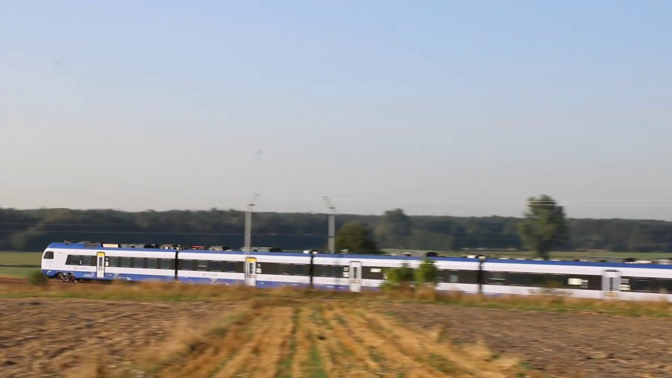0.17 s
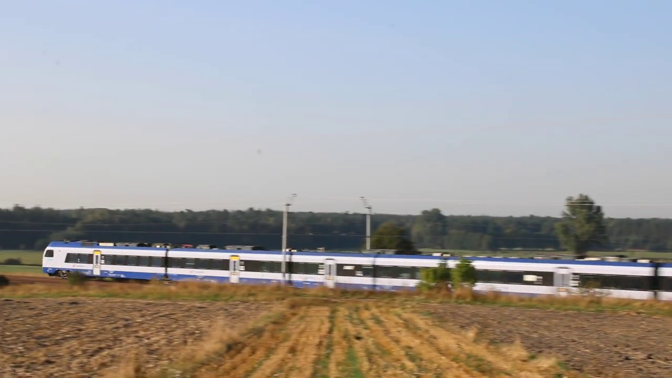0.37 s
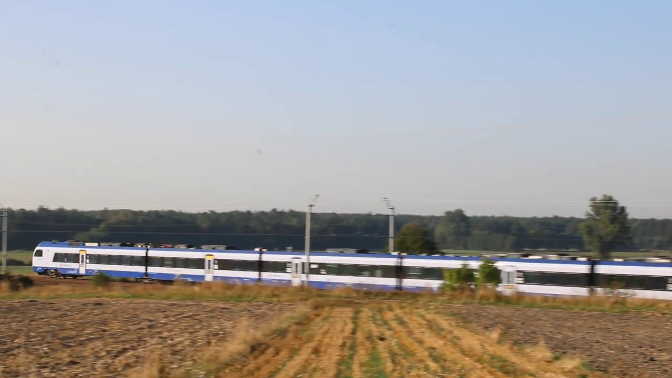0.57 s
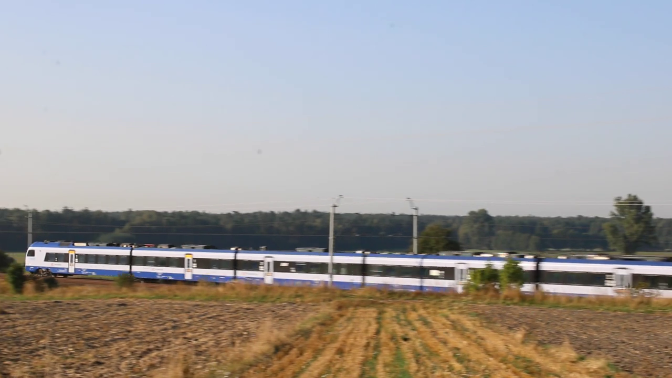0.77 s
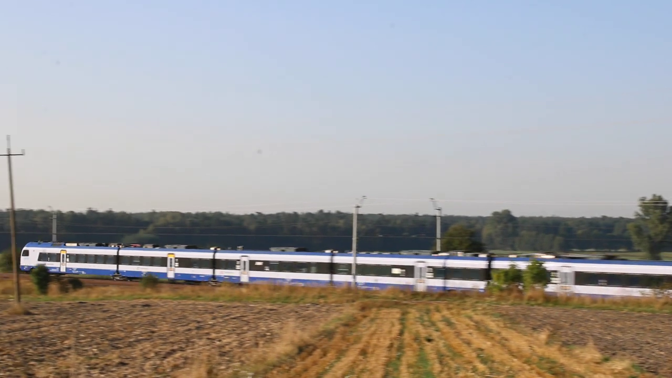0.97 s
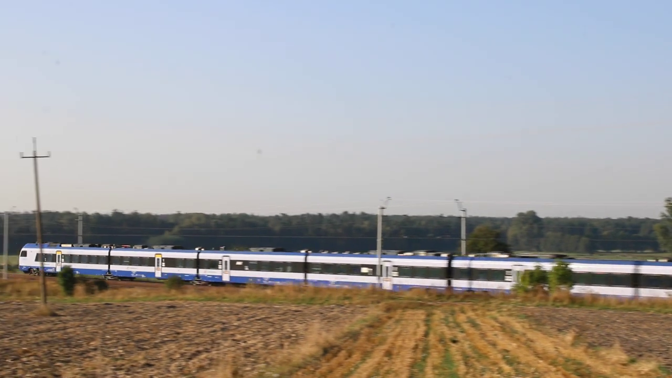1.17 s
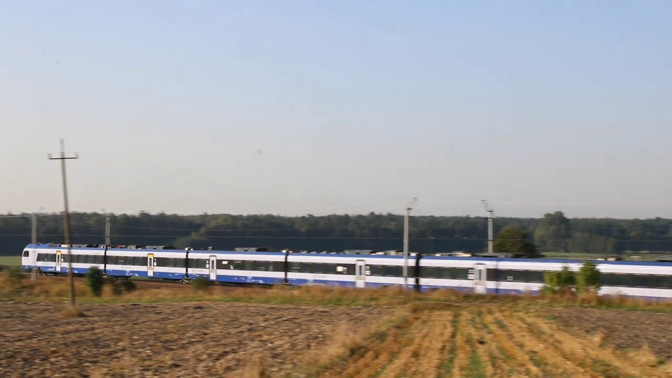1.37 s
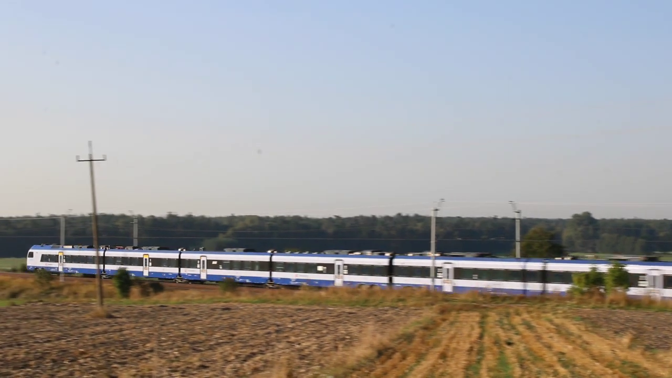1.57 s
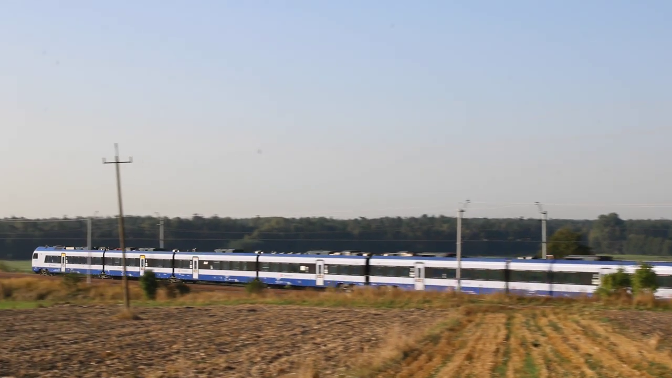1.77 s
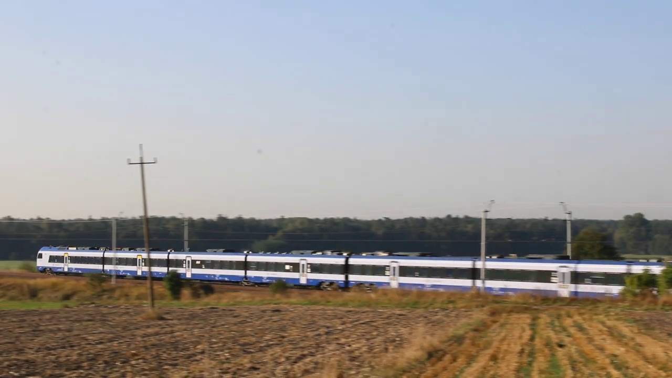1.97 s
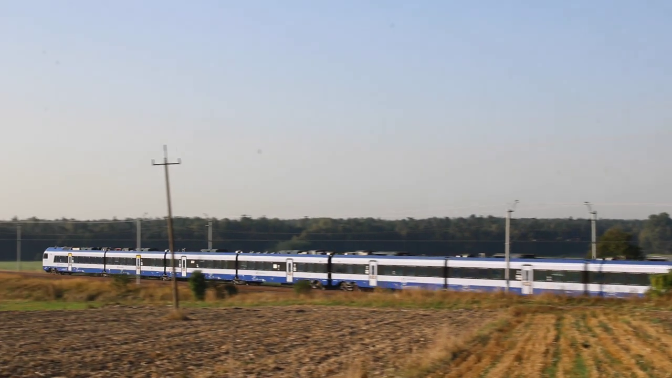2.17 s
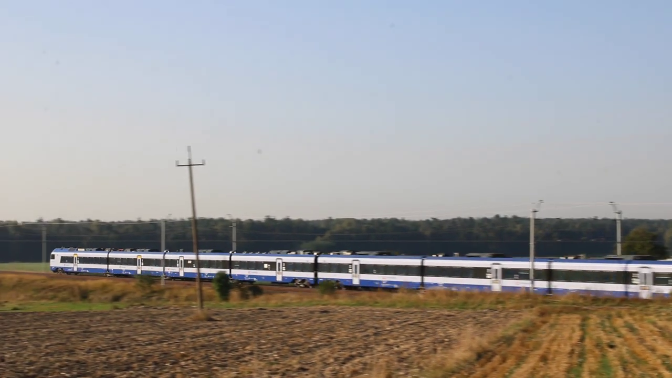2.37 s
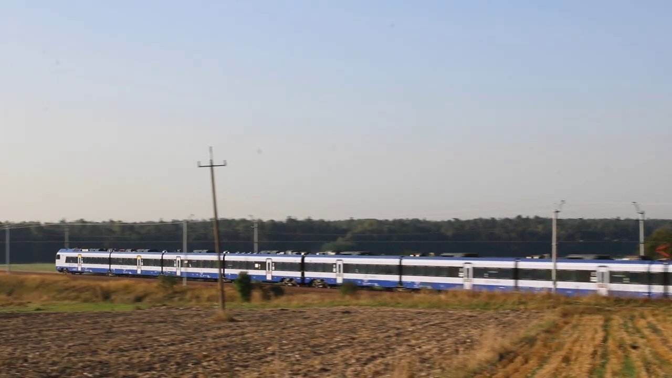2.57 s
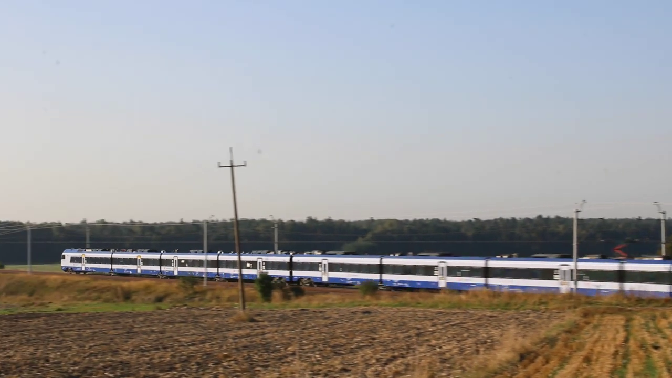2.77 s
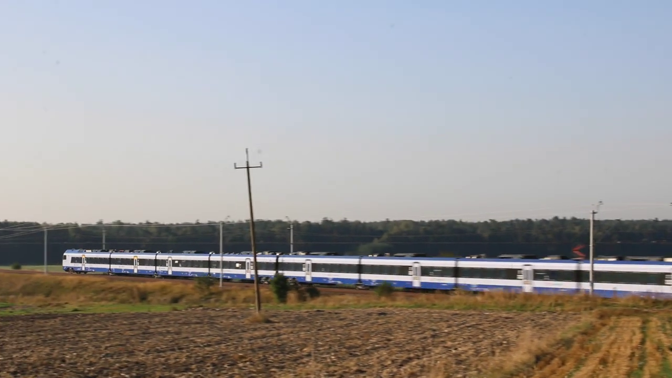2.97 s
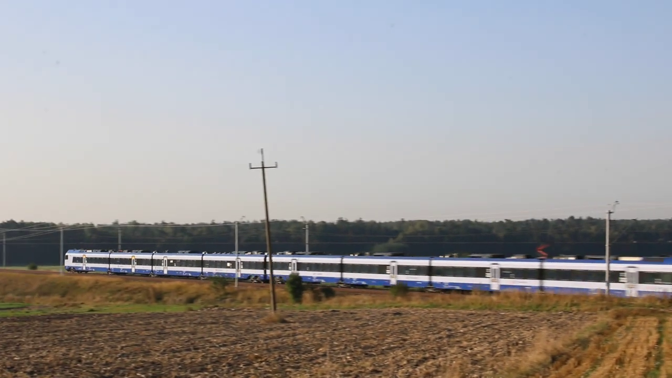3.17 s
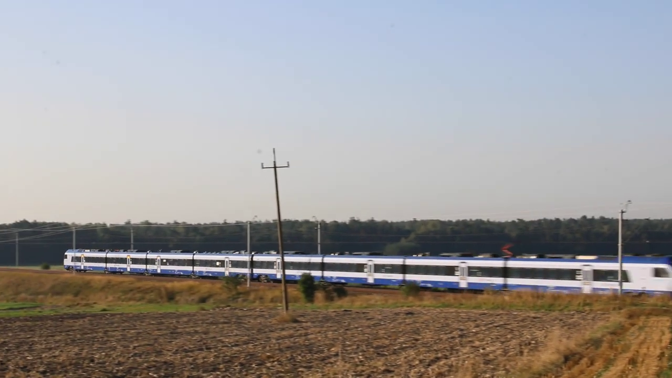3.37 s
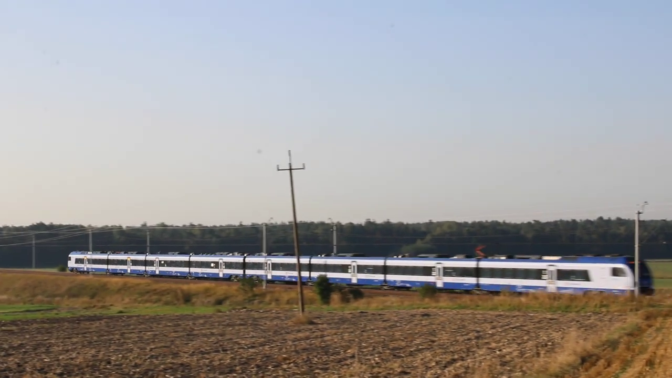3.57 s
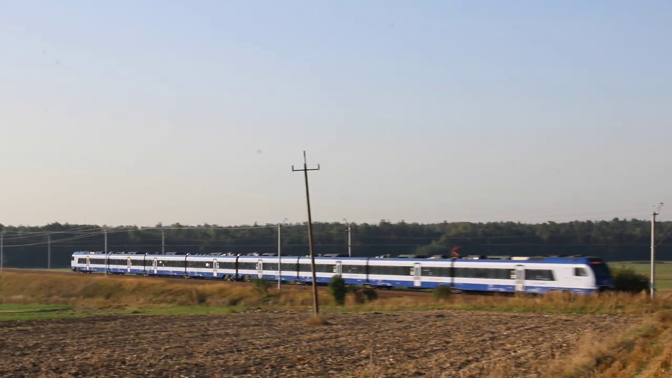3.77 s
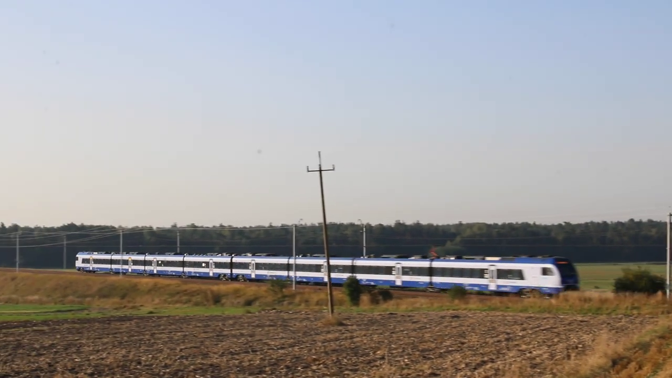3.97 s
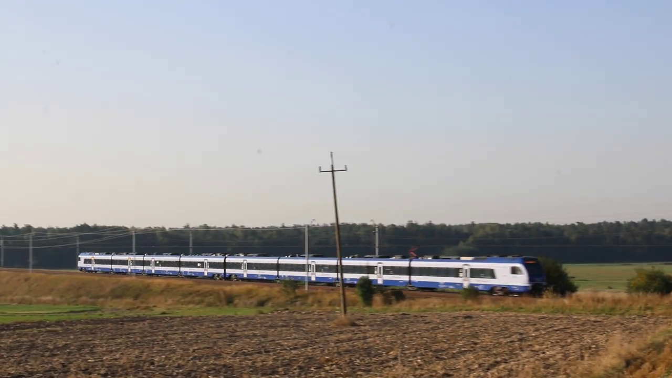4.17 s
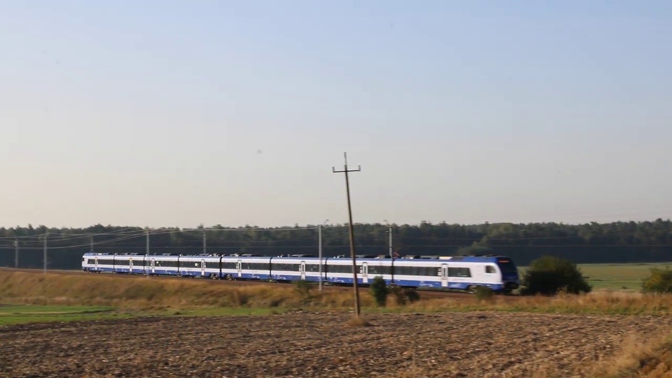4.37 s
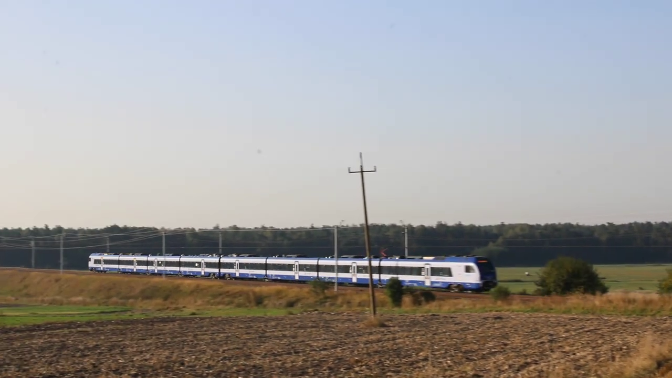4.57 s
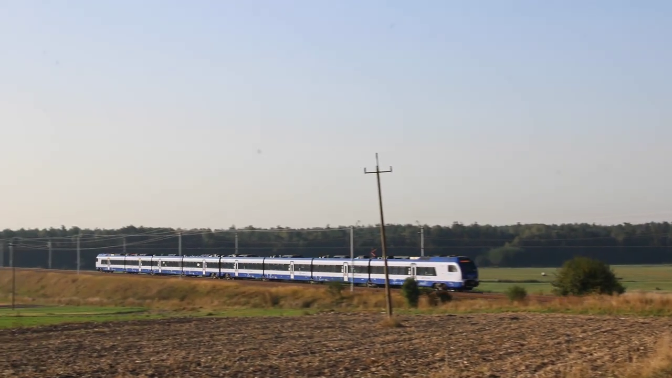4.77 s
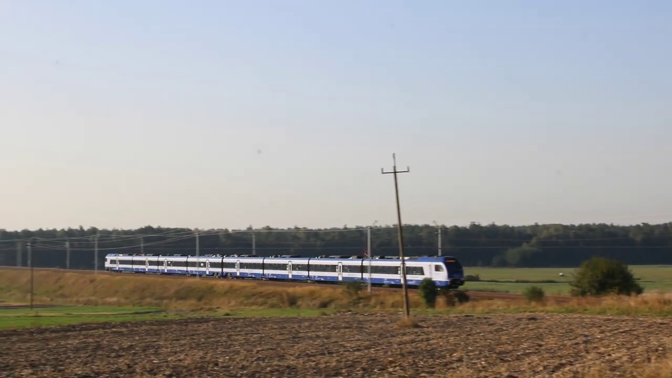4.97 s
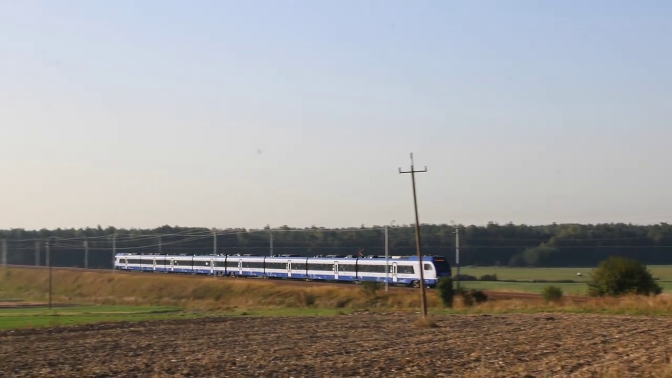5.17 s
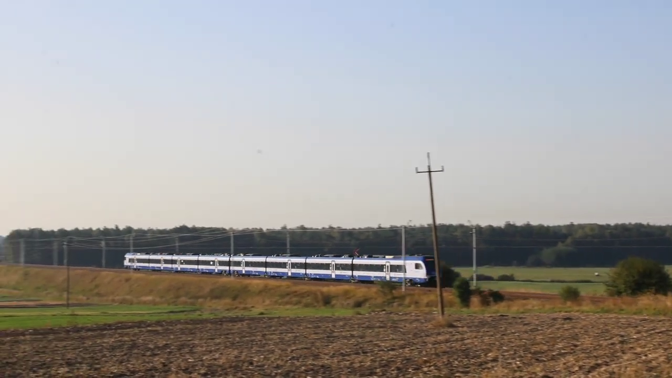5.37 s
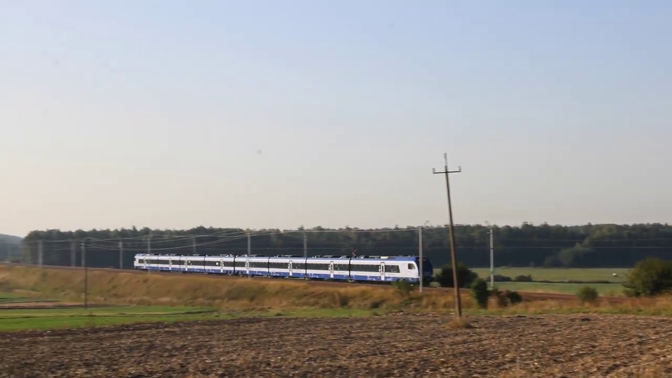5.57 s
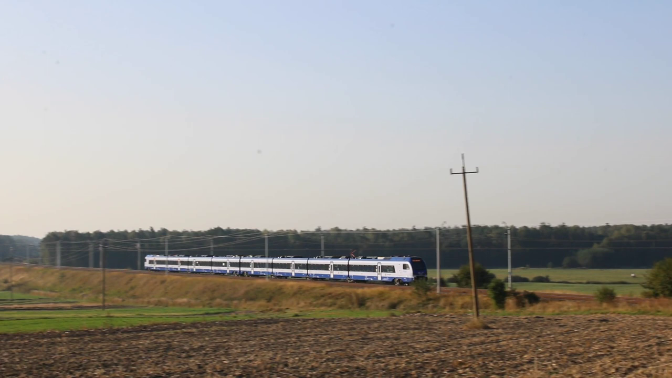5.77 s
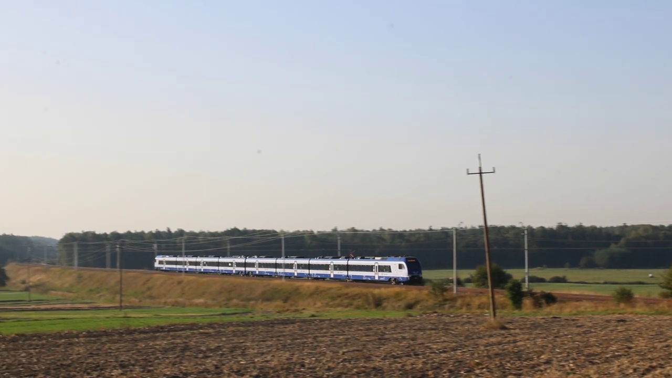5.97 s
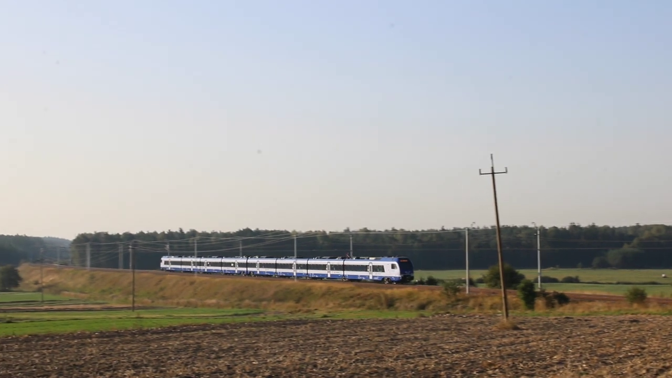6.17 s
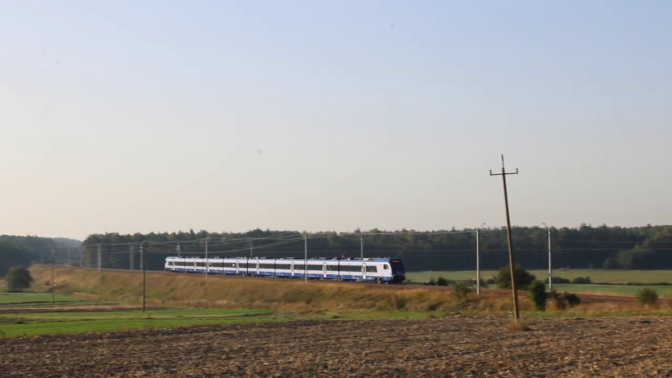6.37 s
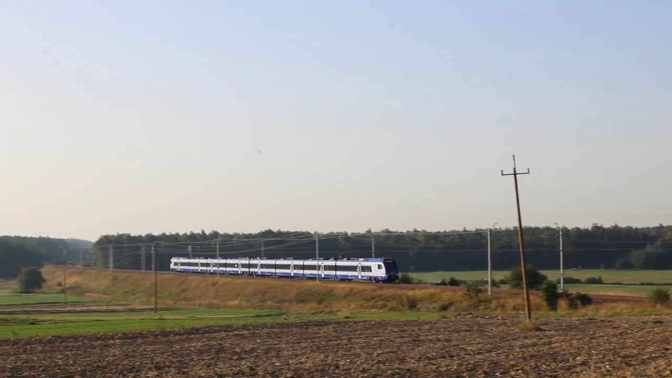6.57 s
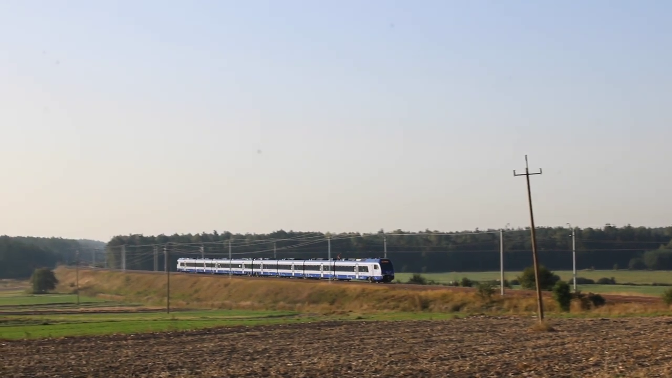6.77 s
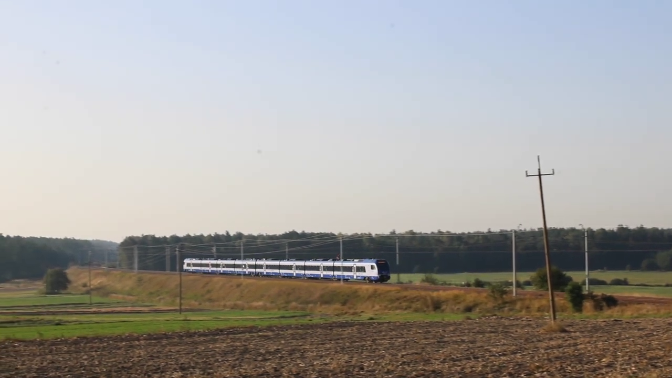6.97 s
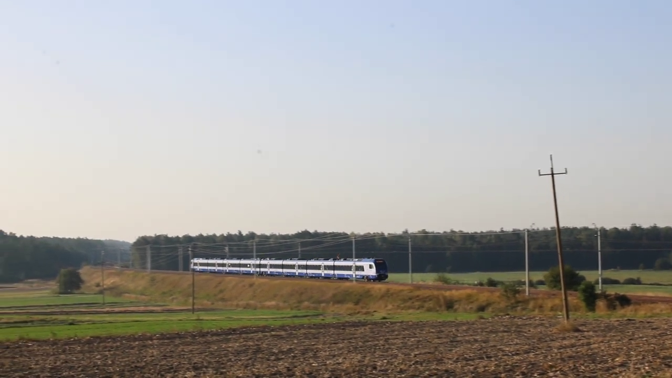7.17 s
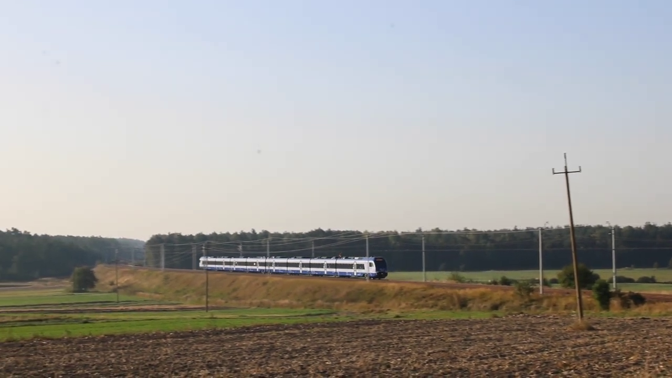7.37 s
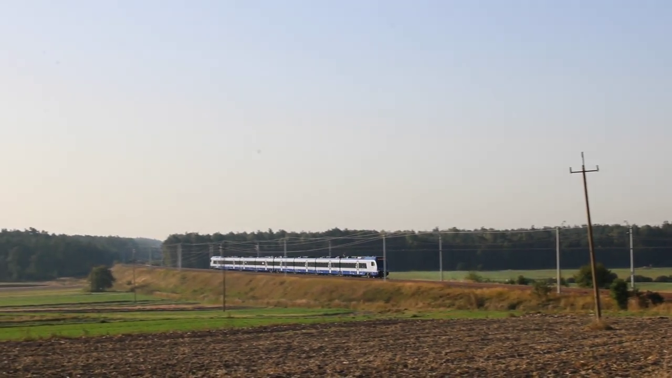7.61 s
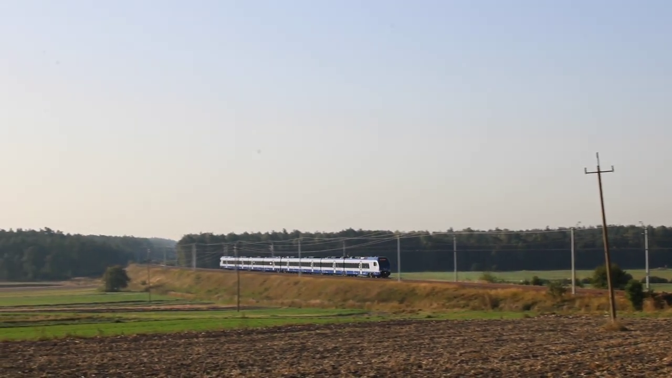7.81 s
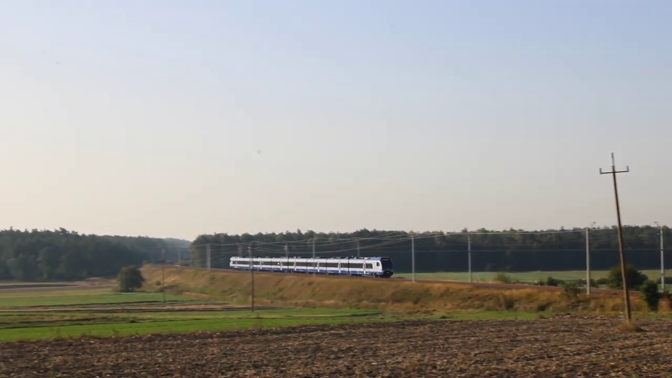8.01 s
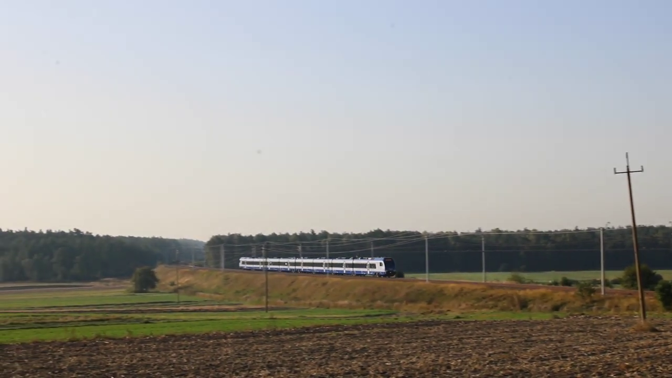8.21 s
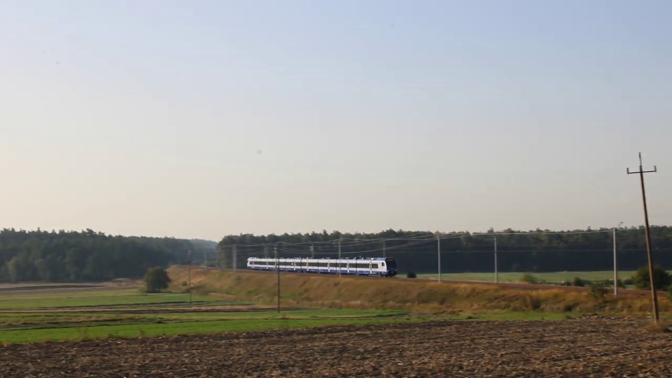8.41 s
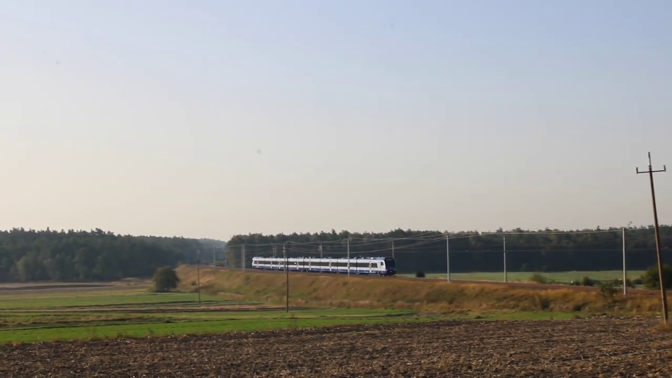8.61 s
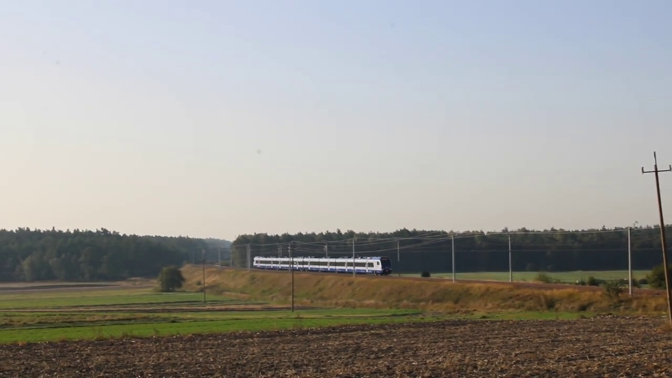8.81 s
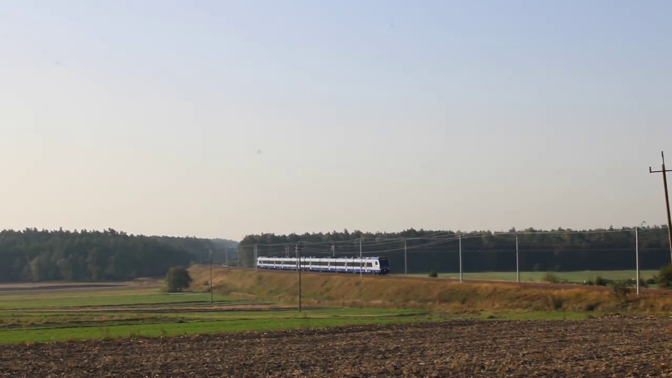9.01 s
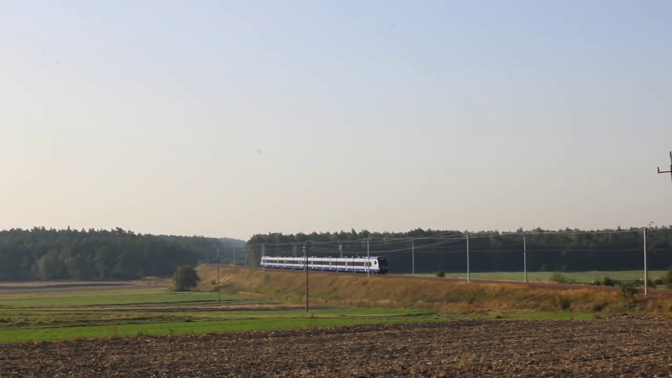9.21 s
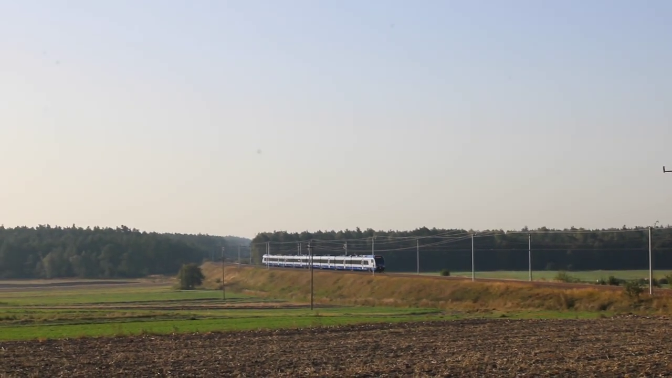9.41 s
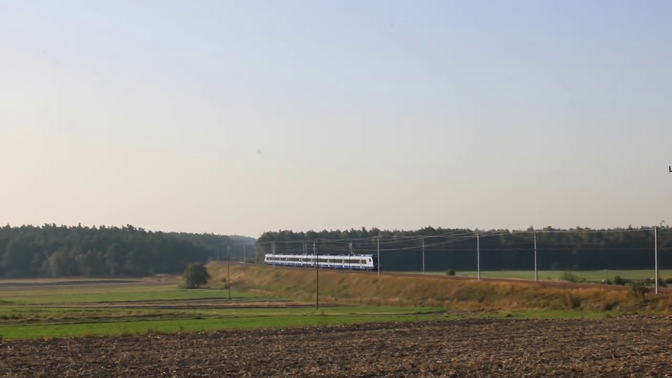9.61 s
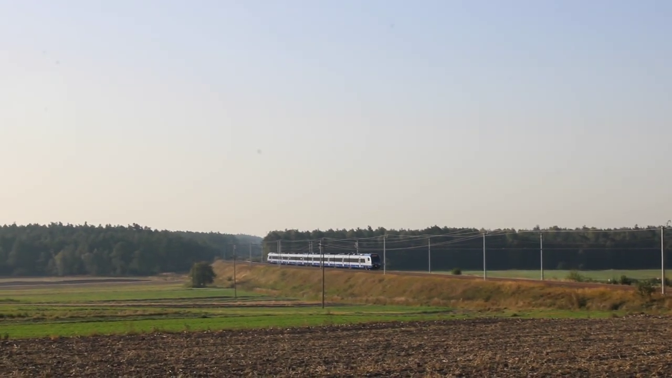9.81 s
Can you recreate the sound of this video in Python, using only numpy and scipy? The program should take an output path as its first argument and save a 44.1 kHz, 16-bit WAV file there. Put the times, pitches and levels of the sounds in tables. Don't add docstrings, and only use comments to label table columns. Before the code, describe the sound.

A fast electric train runs away from a camera microphone at the field's edge. Its broad rolling roar swells a little, peaks around three and a half seconds, then gradually fades and dulls. Metallic wheel singing and a wavering motor whine slide slightly downward. Irregular low wind thumps crowd the opening, some nearly overloading; afterwards it is calmer, with tiny camera clicks, low rumble, and a little wind returning at the very end.

```python
import sys
import numpy as np
from scipy import signal
from scipy.fft import irfft, next_fast_len
from scipy.io import wavfile
from scipy.ndimage import uniform_filter1d

SR = 44100
rng = np.random.default_rng(int(sys.argv[2]) if len(sys.argv) > 2 else 0)


def convert_level_to_amplitude(level_db):
    exponent = np.asarray(level_db, float) / 20
    return 10 ** exponent


def wav_record(signal):
    frames = np.transpose(np.atleast_2d(signal))
    bounded = np.clip(frames, -1, 1)
    quanta = np.round(bounded * 32767).astype(np.int16)
    wavfile.write(sys.argv[1], SR, quanta)


N = 434385
LONG_N = N + N // 10

SPEED_M_S, TRACK_M, ABREAST_RATIO = 25, 57, 1.068

# start_s, buffeting_db
BREEZE = [(0, -29.5), (.33, -34), (.74, -31.5), (1.07, -28.5), (1.21, -33.5), (1.6, -32), (2.36, -36),
          (2.9, -29.5), (3.21, -35), (3.8, -39.5), (5.2, -42), (5.7, -40.5), (6.7, -51), (7.6, -47),
          (8, -55), (9.6, -47), (9.8, -28), (9.85, -27)]


def curves(table):
    s, *columns = np.transpose(table)
    return [np.interp(np.arange(N) / SR, s, column) for column in columns]


def shaped(gain_at, size=N):
    n = next_fast_len(size, True)
    re, im = rng.standard_normal((2, n // 2 + 1))
    hz = np.arange(n // 2 + 1) * SR / n + 1e-3
    x = irfft((re + 1j * im) * gain_at(hz), n)[:size]
    return x / np.std(x)


def coloured(points, size=N):
    hz, db = np.transpose(points)
    return shaped(lambda f: convert_level_to_amplitude(np.interp(np.log(f), np.log(hz), db, left=-150, right=-150)), size)


def walk(rate_hz, size=N):
    hold, fine = int(SR / rate_hz), 16
    steps = np.repeat(rng.standard_normal(size // hold + 1), fine)
    slewed = 1.3 * uniform_filter1d(uniform_filter1d(steps, fine), fine)
    return np.interp(np.arange(size) * fine / hold, np.arange(len(slewed)), slewed)


def tone(hz, waver_hz, flutter_db):
    phase = 2 * np.pi * np.cumsum(hz + waver_hz * walk(25)) / SR
    return np.sqrt(2) * convert_level_to_amplitude(flutter_db * walk(20)) * np.sin(phase)


def add(out, piece, at):
    lo, hi = max(at, 0), min(at + len(piece), len(out))
    out[lo:hi] += piece[lo - at:hi - at]


def motion():
    along_m = SPEED_M_S * np.arange(N) / SR
    range_m = np.hypot(along_m, TRACK_M)
    ratio = ABREAST_RATIO / (1 + SPEED_M_S * along_m / range_m / 343)
    return range_m - TRACK_M, ratio


def moving(x):
    return np.interp(np.cumsum(motion()[1]), np.arange(len(x)), x)


def preamp_hiss():
    # pitch_hz, level_db (per Hz)
    floor_points = [(6000, -36), (8500, -6), (10000, -1.5), (12000, -3.5), (15500, -13.5), (17000, -37)]
    return convert_level_to_amplitude(-74.5) * coloured(floor_points)


def ground_rumble():
    # pitch_hz, level_db (per Hz)
    rumble_points = [(12, -27), (22, -10), (44, 0), (54, 1), (68, -5.5), (83, 2.5), (105, -17),
                     (135, -17.5), (250, -16), (330, -42)]
    return convert_level_to_amplitude(-44 - 3.0 + 1.7 * walk(2.75)) * coloured(rumble_points)


def camera_ticks():
    # start_s, level_db
    tick_events = [(0.2065, -53), (0.2312, -49.0), (0.3296, -54), (0.3628, -53), (1.47, -54),
                   (1.9899, -51.0), (3.2556, -51.9), (3.4235, -50), (3.9161, -50.4), (4.036, -52),
                   (4.3828, -53.4), (4.508, -62.5), (4.8031, -66), (4.915, -53), (6.049, -51),
                   (6.1085, -55.5), (6.1507, -49), (6.5598, -47), (7.0738, -65), (7.3626, -48.1),
                   (8.0624, -58.6), (8.67, -55), (8.849, -46), (9.489, -50), (9.5354, -51.6), (9.644, -53),
                   (9.8146, -47), (9.836, -54)]
    gate, t = np.zeros(N), np.arange(400) / SR
    burst = (t / 0.0007) * np.exp(1 - t / 0.00061)
    for s, db in tick_events:
        add(gate, convert_level_to_amplitude(db + 4.5) * burst, int((s - .0007) * SR))

    def body(f):
        upper = 1 / (1 + ((f - 10700) / 900) ** 2) ** 2
        lower = 1.3 / (1 + ((f - 8800) / 1000) ** 2) ** 2
        return upper + lower

    return gate * shaped(body)


def small_eddies():
    gap_s = .024
    chance = rng.random((int(N / SR / gap_s), 4))
    s = (np.arange(len(chance)) + chance[:, 0]) * gap_s
    breeze_db = np.interp(s, *np.transpose(BREEZE)) + 30
    db = -23.5 + 2.2 * breeze_db + 15.5 * (chance[:, 1] - .5)
    hz = 100 * 2 ** (.9 * chance[:, 2] ** 2)
    cycles = 0.39 + .7 * chance[:, 3]
    return list(zip(s, db, hz, cycles))


def eddy_swing(db, hz, cycles, chance):
    t = np.arange(-1500, 1500) / SR
    bell = np.exp(-4 * np.log(2) * (t * hz / (0.96 * np.clip(cycles, .45, 3))) ** 2)
    turns = (chance[0] > .5) / 2 + 0.17 * (chance[1] - .5)
    swing = bell * np.cos(2 * np.pi * (hz * t + turns))
    kink = convert_level_to_amplitude(-12.5) * bell ** 2.2 * np.cos(2 * np.pi * (2.22 * hz * t + chance[1]))
    swing = swing + kink
    return convert_level_to_amplitude(db) * (swing - swing.sum() * bell / bell.sum())


def wind():
    # pitch_hz, level_db (per Hz)
    buffet_points = [(12, -31), (22, -4.5), (42, 2), (55, 10), (68, 0.5), (84, 3.5), (145, -6), (250, -12),
                     (450, -16), (600, -35)]
    # start_s,
    # peak_db, pitch_hz, length_cycles
    puffs = [(.484, -18.8, 110, 1.1), (.553, -17, 109, .93), (.748, -11, 117, 0.88), (.821, -16, 112, 0.45),
             (.91, -12.5, 123, 1.15), (1.0702, -18, 120, .71), (1.1432, -9.5, 188, 0.49),
             (1.4284, -15.5, 142, .8), (1.512, -14.3, 165, .89), (1.7376, -9, 219, 0.67),
             (1.8167, -11.5, 179, 0.66), (1.946, -8.5, 144, .78), (2.0036, -15, 114, 1.1),
             (2.045, -14, 130, .6), (2.065, -12, 172, 0.58), (2.0897, -16, 119, 0.63),
             (2.1158, 0.5, 185, 0.7), (2.1387, -13, 192, 0.78), (2.376, -4, 260, 0.69),
             (2.6018, -4.5, 147, .58), (2.685, 2.2, 208, 0.64), (2.7464, -12, 140, .5),
             (2.7645, -16, 149, 1.3), (2.7867, -10, 151, .7), (2.89, -17, 225, 0.66), (2.933, -18, 113, .9),
             (2.9798, -11, 118, 0.54), (3.0454, -13, 151, .44), (3.4767, -1.5, 186, 0.5),
             (3.6357, -20, 122, .63),
             (.106, -19.5, 102, .89), (1.66, -19, 135, 0.83), (2.3343, -25, 116, 1.4),
              (2.6493, -16, 136, .45), (2.919, -18, 105, 1.5), (3.0304, -18, 102, 1.25),
              (3.1235, -23, 107, 2), (3.5736, -21, 165, .63), (5.512, -31, 120, .96),
              (5.8085, -22.5, 156, 1), (7.437, -27, 88, 0.66), (7.523, -17, 104, 0.91),
              (7.74, -27, 60, .95), (8.852, -28, 62, 1.04), (9.5003, -21, 152, .81),
              (9.654, -19.5, 116, 1.04), (9.709, -25, 200, 1), (9.7443, -21.5, 138, 0.96),
              (9.782, -24, 90, .86), (9.808, -13.5, 126, 1.1)]
    # start_s, peak_db, pitch_hz, length_cycles
    lobes = [
        (1.151, -20, 330, 1),
        (2.119, -20, 400, 0.65),
        (2.606, -14.5, 75.5, 0.89),
        (3.482, -6.5, 114, 0.64),
        (3.485, -13, 397, 0.94),
        (8.857, -33, 110, .7),
    ]
    out = convert_level_to_amplitude(curves(BREEZE)[0] - 3.0 + 2.5 * walk(25)) * coloured(buffet_points)
    eddies = puffs + lobes + small_eddies()
    for (s, db, hz, cycles), chance in zip(eddies, rng.random((len(eddies), 4))):
        eddy = eddy_swing(db, hz, cycles, chance)
        half = len(eddy) // 2
        add(out, eddy, int(s * SR) - half)
        rebound_s = s + (0.788 + 0.82 * chance[3]) / hz
        add(out, -convert_level_to_amplitude(-7.0 - 18 * chance[2]) * eddy, int(rebound_s * SR) - half)
    return out


def substation_hum():
    # start_s, level_db
    hum_levels = [
        (0, -52),
        (.5, -48),
        (1.4, -48),
        (1.9, -44),
        (2.2, -48),
        (2.4, -70),
    ]
    return convert_level_to_amplitude(curves(hum_levels)[0]) * tone(803, 2.49, 1.9)


def low_drone(air, roar_db):
    # pitch_hz, level_db (per Hz)
    drone_points = [(110, -42), (180, -15), (310, -8), (380, -11.5), (520, -2.5), (650, 0), (760, -1),
                    (870, -5.5), (1000, -9), (1300, -16)]
    spreading_db = 0.66 * 10 * np.log10(1 + motion()[0] / TRACK_M)
    drone_db = -34.5 - spreading_db - roar_db
    return convert_level_to_amplitude(drone_db + 0.24 * air + 0.19 * walk(10)) * coloured(drone_points)


def contact_hiss(air):
    # pitch_hz, level_db (per Hz)
    hiss_points = [(2590, -24), (4400, -4), (4620, -2), (5580, -0.5), (7600, -10), (9880, -47.5),
                   (16700, -120)]
    # pitch_hz, level_db (per Hz)
    sheen_points = [(6500, -32), (7500, -1.5), (8200, -4), (9000, -12.5), (10200, -22), (11700, -35.5),
                    (13500, -49)]
    hiss_db = -8.5 - 16.5 * np.log10(1 + motion()[0] / TRACK_M)
    hiss = convert_level_to_amplitude(hiss_db + 0.21 * air + 0.6 * walk(9.9)) * coloured(hiss_points)
    sheen = convert_level_to_amplitude(1.7 * hiss_db - 5.0 + .4 * air + 0.87 * walk(15)) * coloured(sheen_points)
    return hiss + sheen


def rolling_roar(air, open_db):
    # pitch_hz, level_db (per Hz)
    roar_points = [(500, -51), (850, -21), (927, -14.5), (1010, -10.5), (1430, -5.5), (1480, -9),
                   (1560, -1.5), (1610, -6.5), (1830, -1.5), (1890, -4.5), (2040, -10), (2300, -4),
                   (2700, -14), (3510, -35), (5940, -120)]
    # pitch_hz, level_db (per Hz)
    upper_points = [(1530, -27), (2600, -2), (3140, -1.5), (3950, -8), (4230, -5.5), (4600, -15.5),
                    (5980, -29), (10100, -120)]
    roar = convert_level_to_amplitude(-2.0 + 0.45 * air + 0.3 * walk(14)) * moving(coloured(roar_points, LONG_N))
    upper_gain = convert_level_to_amplitude(open_db - 1.15 + 0.25 * air + 0.45 * walk(12))
    return roar + upper_gain * moving(coloured(upper_points, LONG_N))


def wheel_ring(pitches, family):
    ring = np.zeros(LONG_N)
    for hz, (width_hz, db) in zip(pitches, family):
        mode = shaped(lambda f: 1 / (1 + ((f - hz) / width_hz * 2) ** 2), LONG_N)
        ring += convert_level_to_amplitude(db + 1.6 * walk(7, LONG_N)) * mode
    return moving(ring)


def singing_wheels():
    # start_s, level_db (relative to the roar)
    motor_levels = [(0, -8), (.9, -1), (1.4, -4), (2.5, -15), (3.1, -7), (3.8, -1), (4.9, 2.5), (6.2, 3),
                    (7, 2.5), (9.85, -1)]
    # start_s, level_db (relative to the roar)
    sing_levels = [(0, -4), (.25, 5.5), (.6, -2.5), (.9, 2), (1.4, -3), (1.9, -1.5), (2.5, 3.5),
                   (3.15, 5.5), (3.5, 6.5), (3.75, -1), (4.9, 3), (5.6, 0), (6.3, 0.5), (6.8, -4),
                   (7.7, -6), (8.55, 1), (9.1, -7), (9.5, 0.5), (9.85, -5)]
    mode_pitches = [
        [1290, 1605, 1830, 1895],
        [2232, 2310, 2400, 2490],
        [2826, 2715, 3040, 3085, 3230, 3350, 3552, 3760, 3985, 4200],
    ]
    # width_hz, level_db
    mode_shapes = [
        [(30, -23.5), (20, -22), (60, -13), (60, -13.5)],
        [(25, -15.5), (80, -17), (40, -18), (40, -20.5)],
        [(30, -21), (20, -28.5), (60, -18), (25, -20.5), (30, -25), (20, -27), (25, -22.5), (20, -39),
         (20, -33), (50, -32.5)],
    ]
    away_m, ratio = motion()
    motor_db, sing_db = curves(motor_levels)[0], curves(sing_levels)[0]
    abreast_db = 11 * (ratio - 1) / (ABREAST_RATIO - 1)
    low_db = 0.21 * sing_db + 1.6 - abreast_db
    middle_db = sing_db + .3
    high_db = 0.9 * sing_db + 3.0 - .6 * abreast_db - .03 * away_m
    low_whines = convert_level_to_amplitude(-26.5) * tone(953 * ratio, 6, 3.6) + convert_level_to_amplitude(-16.0) * tone(1514 * ratio, 6.02, 3.5)
    out = convert_level_to_amplitude(motor_db) * low_whines
    out = out + convert_level_to_amplitude(sing_db - 14.5) * tone(2305 * ratio, 8.01, 3.46)
    for pitches, family, family_db in zip(mode_pitches, mode_shapes, (low_db, middle_db, high_db)):
        out = out + convert_level_to_amplitude(family_db) * wheel_ring(pitches, family)
    return out


def train():
    # start_s, roar_db, open_db (how openly the wheels face the microphone)
    passing = [(0, -28, -4), (.6, -26, -4), (1.2, -25, -2.5), (2, -23, -3.5), (2.5, -23.5, -2),
               (2.9, -23.5, -0.5), (3.5, -21, -2), (4.4, -22, -4), (4.8, -23.5, -2), (5.2, -24, -5),
               (6.1, -24.5, -6.5), (7.2, -26, -10.5), (7.7, -26.5, -8.5), (8, -26.5, -7), (8.4, -27.5, -8),
               (8.9, -28.5, -9), (9.85, -29.5, -6)]
    roar_db, open_db = curves(passing)
    air = walk(11)
    rolling = rolling_roar(air, open_db) + low_drone(air, roar_db) + contact_hiss(air)
    return convert_level_to_amplitude(roar_db) * (rolling + singing_wheels()) + substation_hum()


def scene():
    mono = preamp_hiss() + ground_rumble() + camera_ticks() + wind() + train()
    return np.array([mono, mono])


def band_limit(x):
    return signal.sosfilt(signal.butter(12, 15200, fs=SR, output="sos"), x)


def record(dry):
    over = np.clip(np.abs(dry[0]) - .55, 0, .25)
    for lag_s in (.018, .028, .035):
        keep = np.exp(-1 / (lag_s * SR))
        over = signal.lfilter([1 - keep], [1, -keep], over)
    mix = np.clip(dry * convert_level_to_amplitude(-1700 * over), -1, 1)
    return band_limit(mix)


dry = scene()
out = record(dry)
wav_record(out)
```